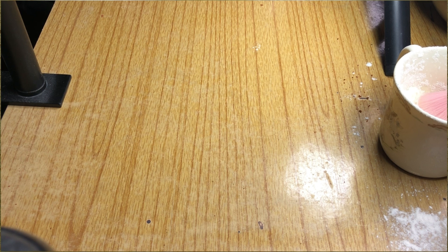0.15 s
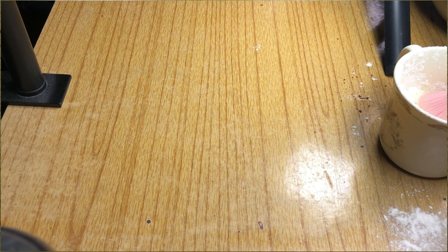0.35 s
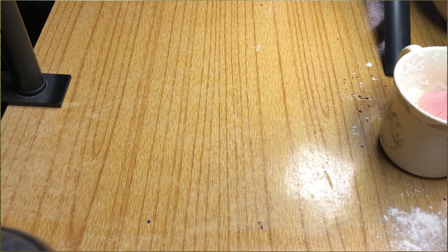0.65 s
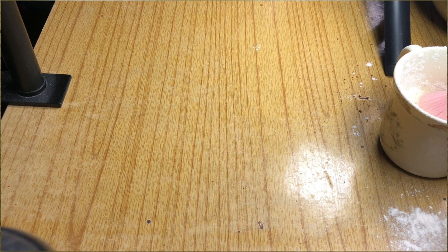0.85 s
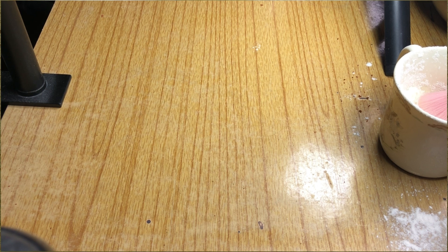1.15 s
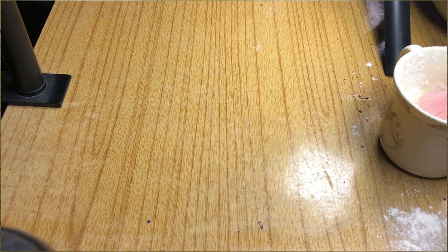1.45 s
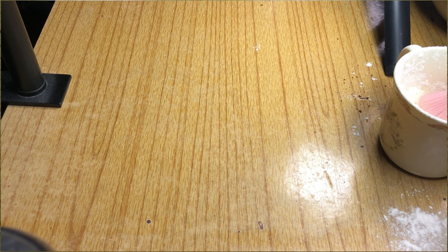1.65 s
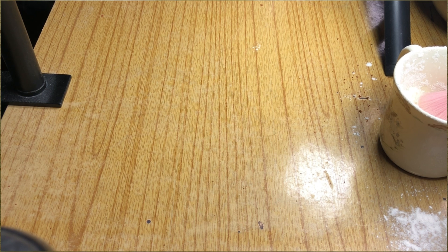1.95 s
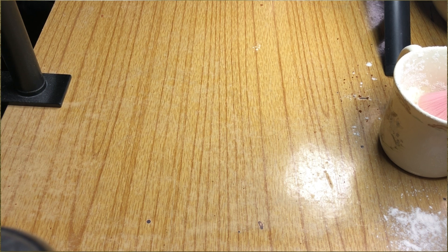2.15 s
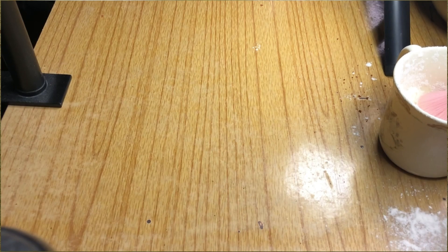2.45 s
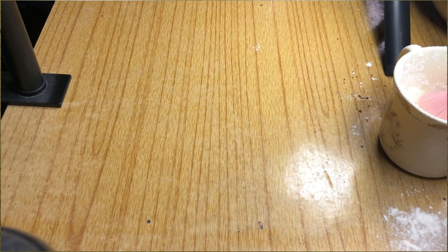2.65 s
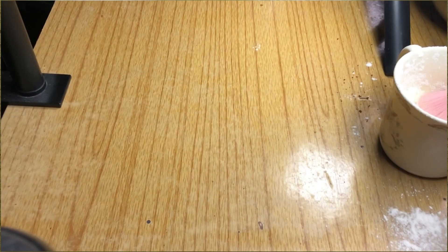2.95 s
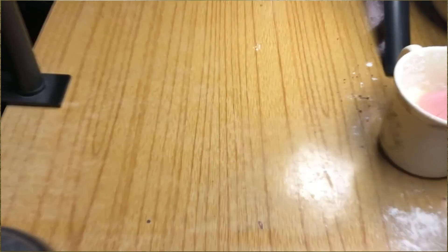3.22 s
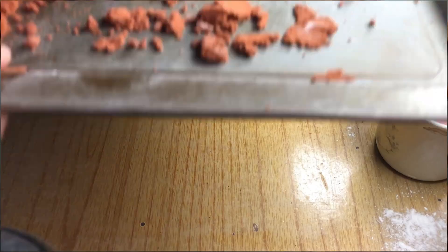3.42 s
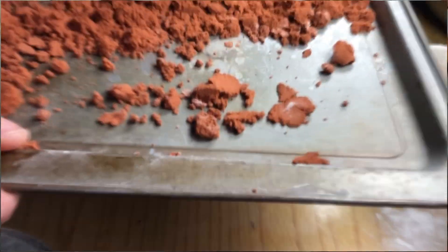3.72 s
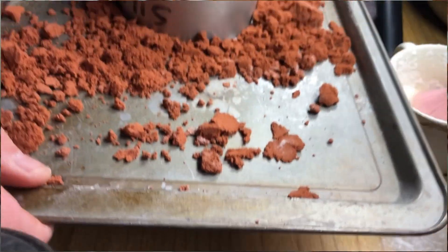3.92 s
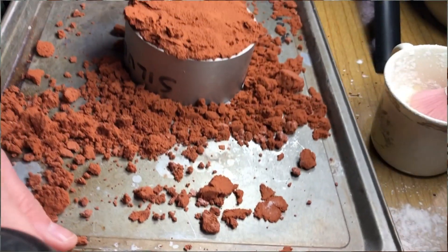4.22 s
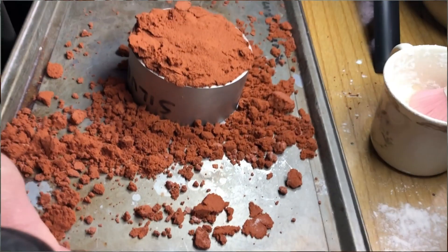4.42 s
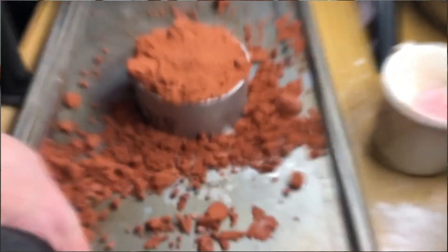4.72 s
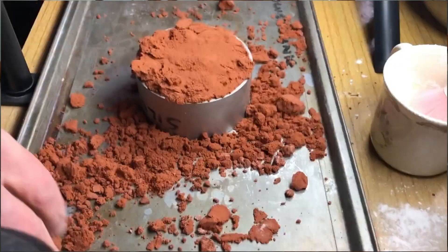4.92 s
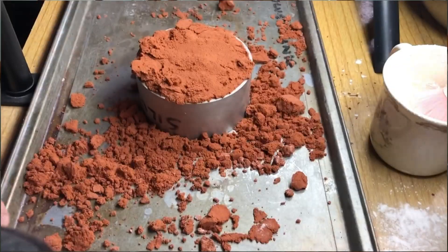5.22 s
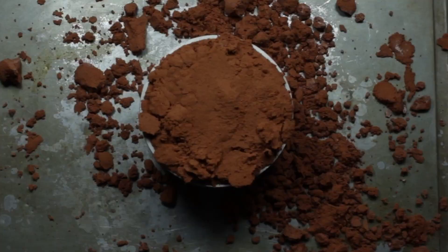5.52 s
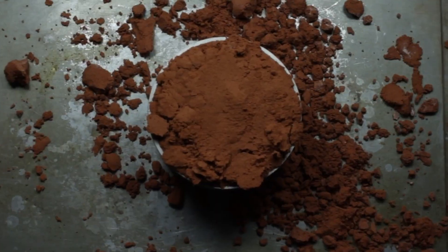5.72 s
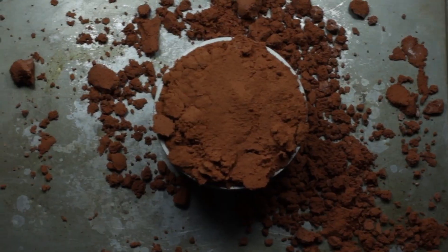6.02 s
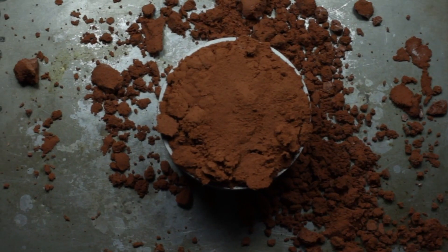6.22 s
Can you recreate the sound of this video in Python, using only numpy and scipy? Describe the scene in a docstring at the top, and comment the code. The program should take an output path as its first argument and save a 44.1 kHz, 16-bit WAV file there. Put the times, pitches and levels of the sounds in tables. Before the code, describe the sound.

A steady, fan-like hum with a faint high whine fills a workshop. For the first two seconds, fingers rub sand softly, with small gritty taps and a dull bump at about 0.6 seconds. At about 2.3, 2.7 and 3.1 seconds, three heavy blows boom through a wooden bench. They are the loudest sounds and overload the close microphone; loose things rattle, steel rings faintly and the level dips after each. From 3.4 to 4.1 seconds a sheet-metal tray scrapes along in short slides with thin, high squeaks. It lands with a clank at 4.4 seconds and a louder one at 4.7, while being shoved over grit until about 4.9. A few faint rubs and ticks follow. Two shorter crunching, juddering shoves come at 5.6 and 6 seconds, with lighter metallic knocks.

```python
"""Packing sand into a steel flask

Fingers rub and tap softly, then three heavy blows boom through a wooden bench and overload the mic.
A sheet-metal tray with the flask scrapes along, lands with two clanks and is shoved three times over grit.
Fan-like room tone lies underneath; an automatic gain control ducks the mix after each loud hit."""
import sys
import numpy as np
from scipy import signal
from scipy.fft import rfft, irfft, next_fast_len
from scipy.io import wavfile
from scipy.ndimage import map_coordinates

SR = 44100
rng = np.random.default_rng(int(sys.argv[2]) if len(sys.argv) > 2 else 0)


def waveform_to_disk(signal):
    """Save audio, clipped to [-1, 1], as 16-bit WAV at the path in sys.argv[1]."""
    frames = np.transpose(np.atleast_2d(signal))
    scaled = np.clip(frames, -1, 1) * 32767
    samples = np.round(scaled).astype(np.int16)
    wavfile.write(sys.argv[1], SR, samples)


N = 280801
TIME = np.arange(N) / SR
AGE = TIME[:SR]  # seconds into a one-shot

# Room tone. Each row: frequency in Hz, level in dB. Levels in all tables are relative.
ROOM_EQ = [(15, -38), (25, -11.5), (48, -6.5), (80, -7.5), (113, -2.5), (241, -6.5), (291, 0.5), (413, -1),
           (460, -1.5), (688, -2), (901, -3.5), (3860, -31.5), (5490, -29.5), (11100, -35), (15700, -42)]
# Electrical whine. Each row: frequency in Hz, width in Hz, level in dB.
WHINE_PEAKS = [(5650, 70, -15), (8700, 14, -8), (9975, 50, 2), (10800, 70, -2)]
# Finger strokes. Each row: start in seconds, length in seconds, level in dB, tilt in dB per octave.
RUB_CUES = [(.01, 0.026, -35, .5), (0.114, 0.32, -54, 3), (0.404, 0.24, -43, -0.5),
            (1.199, 0.074, -47, 3.5), (1.298, .2, -51, 2), (1.493, .16, -46, 0.5), (1.747, 0.21, -45, 1.5),
            (1.943, 0.24, -40.5, -1), (4.86, 0.12, -49, 2), (5.041, 0.032, -46.5, 2)]
# Sand hiss. Each row: frequency in Hz, level in dB.
SAND_EQ = [(30, -29), (120, -2.5), (250, -11), (550, -0.5), (900, -0.5), (1700, -2.5), (3000, -8.5),
           (5500, -16), (11000, -19), (13500, -24), (16000, -31.5)]
# Finger and tool taps. Each row: start in seconds, level in dB, pitch in Hz.
TAP_CUES = [(0.0242, -49, 4560), (0.3577, -46, 3700), (0.4238, -35.5, 1970), (.5033, -40, 2360),
            (0.542, -43.5, 3320), (0.598, -31.5, 7600), (.672, -37.5, 1290), (.9527, -47, 2340),
            (1.304, -44.5, 2950), (1.7361, -30.5, 1620), (3.2953, -32.5, 900), (3.5598, -30, 620),
            (3.6355, -38, 10900), (4.0344, -40, 2870), (5.1262, -44.5, 3400), (5.232, -49.5, 2880),
            (5.366, -57.5, 2900)]
# Crunch of grit. Each row: frequency in Hz, level in dB.
GRIT_EQ = [(30, -55), (150, -21), (400, -6), (800, 5.5), (1300, 1.5), (2100, 1), (3300, -2.5), (5000, -9.5),
           (10000, -16.5), (13000, -19.5), (16000, -37)]
# Soft bumps on the bench. Each row: start in seconds, level in dB.
BUMP_CUES = [(0.048, -28.5), (0.579, -22)]
# The bench top's modes. Each row: frequency in Hz, level in dB, T60 in seconds.
BENCH_MODES = [(34.3, -23.5, 0.12), (89.4, 3.5, 0.16), (126.8, 2, 0.12), (151, 4, 0.12),
               (196.9, -5.5, 0.17), (205, -12, 0.11), (260.4, -6, 0.21), (332, -7.5, 0.15),
               (353.3, -2, 0.14), (404.6, -6.5, 0.15), (458, -11, 0.087), (513.5, -29.5, 0.16),
               (608, -12.5, 0.15), (790, -13.5, 0.17), (1347, -25, 0.14)]
# Metal squeaks. Each row: start in seconds, pitch in Hz, level in dB, T60 in seconds, jitter in radians.
SQUEAK_CUES = [(.165, 3230, -51, 0.41, 2.6), (3.875, 6750, -43, 0.25, 0.59), (3.905, 6400, -47, 0.26, .4),
               (3.91, 2350, -55.5, 1., .5), (4.08, 5640, -64, .9, 0.45)]
# Heavy blows. Each row: start in seconds, thump in dB, tilt in dB per octave, rattle in dB,
# flask ring in dB, ring centre in Hz.
BLOW_CUES = [(2.2511, 8, -2, -4.5, -51, 3640), (2.679, 8, 2, 0, -46.5, 2950),
             (3.083, 8.5, 2, -1, -51, 3270)]
# Loose things rattling on the bench. Each row: frequency in Hz, level in dB.
RATTLE_EQ = [(60, -44), (250, -8.5), (420, -3), (700, -14), (1300, -19), (2000, -23.5), (3500, -30.5),
             (6000, -40), (11000, -45.5), (16000, -62.5)]
# The rattle's tail. Each row: frequency in Hz, T60 in seconds.
RATTLE_DECAY = [(200, 0.18), (1000, .16), (4000, 0.15), (12000, 0.16)]
# The room's rumble after a blow. Each row: frequency in Hz, level in dB.
RUMBLE_EQ = [(25, -12), (60, -7.5), (88, -3), (110, -5), (135, 0), (200, -12.5), (400, -10), (900, -48)]
# Metalware buzzing after a blow. Each row: frequency in Hz, level in dB.
BUZZ_EQ = [(300, -18), (700, 3.5), (1500, -2.5), (2800, -8.5), (4200, -13.5), (6500, -29), (16000, -50)]
# The flask's long ring. Each row: frequency in Hz, level in dB, T60 in seconds.
FLASK_MODES = [(2870, 5.5, 1.72), (3531, 4.5, 2.5), (4603, 3, 1.4)]
# Slides of the tray's edge. Each row: start in seconds, length in seconds, level in dB.
SCRAPE_CUES = [(3.381, .2, -31), (3.588, 0.254, -33), (3.849, 0.08, -33), (4.031, 0.052, -32.5)]
# The lifted tray's resonances. Each row: frequency in Hz, width in Hz, level in dB.
LIFTED_TRAY_PEAKS = [(627.6, 31, 3.5), (844, 17, 4.5), (1034, 43, -1.5), (1400, 48, 7.5), (1593, 48, -2),
                     (1870, 62, -4), (2435, 75, -9.5), (2720, 160, -5), (3090, 36, -4.5), (3250, 25, -22),
                     (3600, 49, -16), (6620, 68, -17), (8150, 180, -32), (12500, 49, -24)]
# Tray hits. Each row: start in seconds, clank in dB, thud in dB, sheet ring in dB.
KNOCK_CUES = [(3.386, -38, -21.5, -41), (4.3858, -16, -5, -16), (4.415, -21, -7.5, -13),
              (4.6208, -17, -16.5, -27), (4.6564, 0.5, -6, 5), (4.7194, -22, -22.5, -17),
              (4.733, -16, -16.5, -17), (4.7741, -19, -50, -48), (5.607, -33.5, -43, -63),
              (5.635, -26.5, -49, -58), (5.6531, -17, -42, -29.5), (5.6935, -18, -27, -24),
              (5.7625, -23, -62, -48), (6.1306, -21.5, -35, -44)]
# The rim's clank. Each row: frequency in Hz, level in dB.
CLANK_EQ = [(30, -31), (600, -53), (950, -6), (1250, -22), (1550, -5.5), (1830, -3), (2200, -2.5),
            (3600, -7), (6000, -16), (10000, -15), (13000, -23), (16000, -38)]
# The wood's thud under the tray. Each row: frequency in Hz, level in dB.
THUD_EQ = [(20, -34), (110, -11.5), (220, -17), (305, 6), (400, -4), (700, -2.5), (1100, -6.5), (1800, -11),
           (4000, -22), (16000, -68)]
# The tail of clank and thud. Each row: frequency in Hz, T60 in seconds.
KNOCK_DECAY = [(300, 0.28), (1500, 0.14), (4000, 0.14), (12000, 0.11)]
# The loaded tray's sheet. Each row: frequency in Hz, level in dB, T60 in seconds.
SHEET_MODES = [(196, -14, 0.066), (316.3, -1, 0.075), (670, -16, 0.036), (1070, -13.5, 0.16),
               (1190, -1.5, 0.046), (1320, -11, 0.14), (1640, 2, 0.039), (1806, 2, 0.032),
               (1900, -12, 0.16), (2276, -9.5, 0.054), (2330, -14, 0.16), (2870, -18, 0.06)]
# The tray's resonances flat on the bench. Each row: frequency in Hz, width in Hz, level in dB.
FLAT_TRAY_PEAKS = [(192.4, 18, -6), (309.8, 9.4, 3), (389, 40, -6.5), (462, 27, -4), (748, 110, -17)]
# Pushes on the tray. Each row: start in seconds, length in seconds, grit in dB, judder in dB.
SHOVE_CUES = [(4.446, 0.43, -24, -25.5), (5.579, 0.27, -29.5, -31), (5.987, .17, -24, -24)]


def amp(db):
    """Decibels to gain."""
    return 10 ** (np.asarray(db) / 20)


def unit(x):
    """Scale to rms 1."""
    return x / np.sqrt(np.mean(x ** 2) + 1e-20)


def along(points, hz):
    """Read a curve of (Hz, value) points on a log axis."""
    freqs, values = np.transpose(points)
    return np.interp(np.log(hz + 1), np.log(freqs + 1), values)


def wobble(rate):
    """A smooth random modulator, rate knots a second."""
    return map_coordinates(rng.standard_normal(int(N * rate / SR) + 4), [TIME * rate])


def filtered(x, response):
    """Filter x by a function of frequency in Hz."""
    size = next_fast_len(len(x) + 8192)
    return irfft(rfft(x, size) * response(np.fft.rfftfreq(size, 1 / SR)), size)[:len(x)]


def coloured(x, eq):
    """x through an EQ curve, at rms 1."""
    return unit(filtered(x, lambda hz: amp(along(eq, hz))))


def noise(eq, samples=SR):
    """Noise through an EQ curve, at rms 1."""
    return coloured(rng.standard_normal(samples), eq)


def resonate(x, peaks):
    """x through a body's resonances in alternating polarity, at rms 1."""
    def response(f):
        return sum((-1) ** k * amp(db) * 1j * f * width / (hz * hz - f * f + 1j * f * width)
                   for k, (hz, width, db) in enumerate(peaks))
    return unit(filtered(x, response))


def rise(attack_s):
    """A one-shot's attack, from 0 towards 1."""
    return 1 - np.exp(-AGE / attack_s)


def fade(db, t60):
    """A one-shot's tail: starts at db and loses 60 dB every t60 seconds."""
    return amp(db - 60 * AGE / t60)


def ring(modes, scatter_db):
    """Damped modes, struck a little differently each time."""
    return sum((-1) ** k * fade(db + scatter_db * rng.standard_normal(), t60)
               * np.sin(2 * np.pi * hz * AGE) for k, (hz, db, t60) in enumerate(modes))


def clatter(eq, decay):
    """A crowd of dense modes, each band dying at its own speed."""
    hz, t, bands = signal.stft(noise(eq), SR, nperseg=256)
    tails = amp(-60 * t / along(decay, hz)[:, None])
    return signal.istft(bands * tails, SR, nperseg=256)[1][:SR]


def grains(rate, spread_db):
    """Tiny slips of uneven size at random moments, about rate a second."""
    hits = rng.random(N) < rate / SR
    return unit(hits * rng.standard_normal(N) * amp(spread_db * rng.standard_normal(N)))


def stroke(length, attack_s, release_s, sag_db_per_s=0):
    """A stroke's envelope: it builds, holds or sags for length seconds, and dies away."""
    hold = amp(-sag_db_per_s * np.minimum(AGE, length))
    return rise(attack_s) * hold * np.exp(-np.maximum(AGE - length, 0) / release_s)


def add(track, start, sound):
    """Mix a sound in at start seconds."""
    part = track[max(round(start * SR), 0):][:len(sound)]
    part += sound[:len(part)]


def room_tone():
    """A gently wavering, fan-like bed with a faint electrical whine."""
    whine = amp(-74) * resonate(rng.standard_normal(N), WHINE_PEAKS)
    waver = amp(.5 * wobble(6))
    return amp(-42.5) * waver * noise(ROOM_EQ, N) + whine


def sand_rubs():
    """Fine sand hisses under the fingers; light strokes are thin and bright, firm ones fuller."""
    hiss = coloured(grains(12000, spread_db=1.5), SAND_EQ) * amp(1.2 * wobble(35))
    out = np.zeros(N)
    for start, length, db, tilt in RUB_CUES:
        patch = np.roll(hiss, -round(start * SR))[:SR]
        tilted = unit(filtered(patch, lambda hz: amp(tilt * np.log2(hz + 1))))
        add(out, start, amp(db) * stroke(length, attack_s=.024, release_s=.031) * tilted)
    return out


def taps():
    """Each touch is a gritty tick with one broad resonance of the thing touched."""
    out = np.zeros(N)
    for start, db, hz in TAP_CUES:
        tick = noise(GRIT_EQ)
        body = resonate(tick, [(hz, .31 * hz, 0)])
        add(out, start, fade(db, t60=.1) * (.55 * tick + .7 * body) * rise(.0008))
    return out


def struck_bench(tilt):
    """The bench's modes tilted in dB per octave: a harder contact feeds the high ones more."""
    pivot_hz = BENCH_MODES[1][0]
    return [(hz, db + tilt * np.log2(hz / pivot_hz), t60) for hz, db, t60 in BENCH_MODES]


def bench_bumps():
    """Soft contacts swell into dull thumps, without the bench's deepest mode."""
    out = np.zeros(N)
    for start, db in BUMP_CUES:
        thump = ring(struck_bench(tilt=-5)[1:], scatter_db=2)
        add(out, start, amp(db) * thump * rise(.024))
    return out


def squeaks():
    """Metal slips on metal and swells into one thin, unsteady tone that rings on."""
    out = np.zeros(N)
    for start, hz, db, t60, jitter in SQUEAK_CUES:
        phase = 2 * np.pi * hz * AGE + jitter * wobble(117)[:SR]
        add(out, start, fade(db, t60) * rise(.024) ** 2 * 2 * np.sin(phase))
    return out


def heavy_blows():
    """The bench booms, loose things rattle, the room rumbles, metalware buzzes and the flask rings."""
    out = np.zeros(N)
    for start, thump_db, tilt, rattle_db, ring_db, centre_hz in BLOW_CUES:
        add(out, start, amp(thump_db) * ring(struck_bench(tilt), scatter_db=3.5) * rise(.0036))
        add(out, start, amp(rattle_db - 2.5) * clatter(RATTLE_EQ, RATTLE_DECAY) * rise(.0017))
        # loose things jump and rattle harder a moment later
        add(out, start + .014, amp(rattle_db + 5) * clatter(RATTLE_EQ, RATTLE_DECAY) * rise(.00053))
        add(out, start, fade(thump_db - 31, t60=1) * noise(RUMBLE_EQ) * rise(.02))
        add(out, start, fade(-38, t60=1.42) * noise(BUZZ_EQ) * rise(.02))
        add(out, start, amp(ring_db) * flask_ring(centre_hz))
    return out


def flask_ring(centre_hz, split_hz=13.7):
    """A nearly round wall has each mode twice, slightly apart, so its ring beats; it also flickers."""
    # the struck spot favours the modes near centre_hz
    modes = [(hz, db - 40 * abs(np.log2(hz / centre_hz)), t60) for hz, db, t60 in FLASK_MODES]
    twins = [(hz + split_hz * (.5 + rng.random()), db - 10, t60) for hz, db, t60 in modes]
    flicker = amp(2.6 * wobble(55)[:SR] - 1.5)
    return flicker * ring(modes + twins, scatter_db=1.5)


def tray_scrapes():
    """The edge catches and slips; the free sheet sings, and the bench's echo sweeps its colour."""
    slips = grains(5000, spread_db=2.5) * amp(1.6 * wobble(80))
    bite = np.zeros(N)
    for start, length, db in SCRAPE_CUES:
        add(bite, start, amp(db) * stroke(length, attack_s=.0048, release_s=.01, sag_db_per_s=37))
    direct = bite * (resonate(slips, LIFTED_TRAY_PEAKS) + amp(-8) * coloured(slips, GRIT_EQ))
    travel_s = np.maximum(TIME - SCRAPE_CUES[0][0], 0)
    delay_s = .00189 + .00105 * travel_s  # the echo comes later as the tray travels
    return direct + .55 * np.interp(TIME - delay_s, TIME, direct)


def tray_knocks():
    """The rim clanks, hardest at the instant of contact; the wood thuds and the sheet rings."""
    out = np.zeros(N)
    punch = 1 + 1.4 * np.exp(-AGE / .005)
    for start, clank_db, thud_db, sheet_db in KNOCK_CUES:
        add(out, start, amp(clank_db - 6.5) * clatter(CLANK_EQ, KNOCK_DECAY) * punch * rise(.00016))
        add(out, start, amp(thud_db - 2) * clatter(THUD_EQ, KNOCK_DECAY) * punch * rise(.00081))
        add(out, start, amp(sheet_db) * ring(SHEET_MODES, scatter_db=-2) * rise(.001))
    return out


def push_speed(start, length):
    """A push gathers speed and slows again in one arch, 0 to 1."""
    return np.abs(np.sin(np.pi * np.clip((TIME - start) / length, 0, 1)))


def tray_shoves(judder_lag_s=.016):
    """Grit crunches under the loaded tray, which judders on the bench; both grow with its speed."""
    slips = grains(6000, spread_db=3) * amp(1.6 * wobble(130))
    grit = coloured(slips, GRIT_EQ)
    judder = resonate(grains(9000, spread_db=1), FLAT_TRAY_PEAKS)
    out = np.zeros(N)
    for start, length, grit_db, judder_db in SHOVE_CUES:
        out += amp(grit_db) * push_speed(start, length) ** 1.76 * grit
        out += amp(judder_db) * push_speed(start + judder_lag_s, length) ** 1.56 * judder
    return out


def scene():
    """Hits, friction and room tone in one mono mix."""
    hits = heavy_blows() + bench_bumps() + tray_knocks() + taps()
    friction = squeaks() + sand_rubs() + tray_scrapes() + tray_shoves()
    return (hits + friction + room_tone())[None]


def gain_control(x, threshold_db, depth_db, attack_s, recovery_db_per_s):
    """Loud peaks duck the gain by up to depth_db; it climbs back steadily."""
    over_db = np.clip(20 * np.log10(np.abs(x) + 1e-9) - threshold_db, 0, depth_db)
    climb_db = recovery_db_per_s * TIME
    duck_db = np.maximum.accumulate(over_db + climb_db) - climb_db
    pole = np.exp(-1 / (attack_s * SR))
    return x * amp(-signal.lfilter([1 - pole], [1, -pole], duck_db))


def record(dry):
    """The gain control is too slow for the blows, so they clip; a low-pass trims the very top."""
    ducked = gain_control(dry[0], threshold_db=-10, depth_db=12, attack_s=.045, recovery_db_per_s=34)
    clipped = ducked / (1 + np.abs(ducked / .95) ** 8) ** (1 / 8)
    return filtered(clipped, lambda hz: hz < 15850)[None]


dry = scene()
out = record(dry)
waveform_to_disk(out)
```